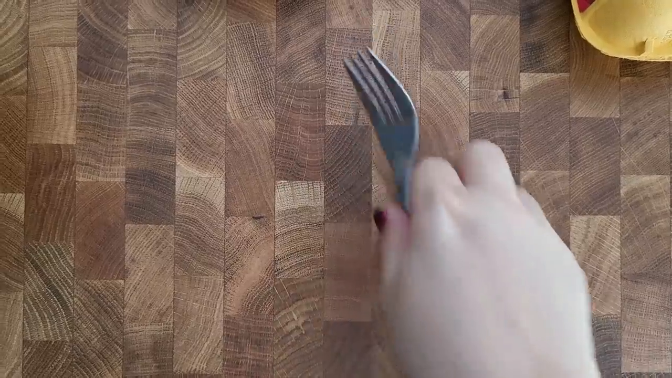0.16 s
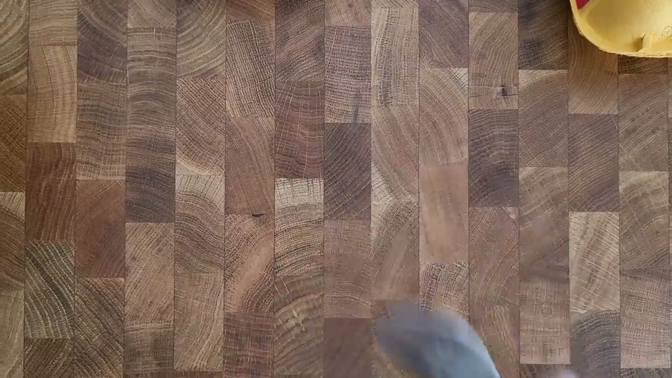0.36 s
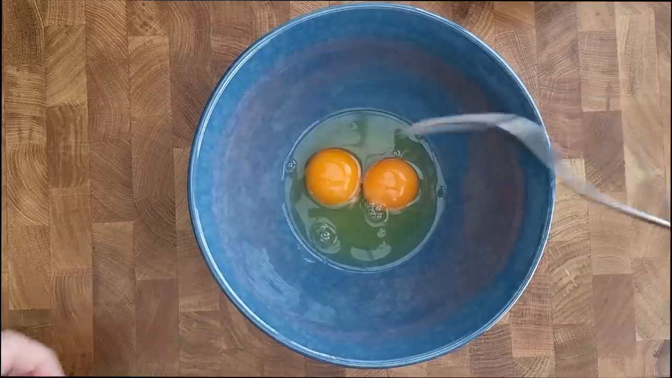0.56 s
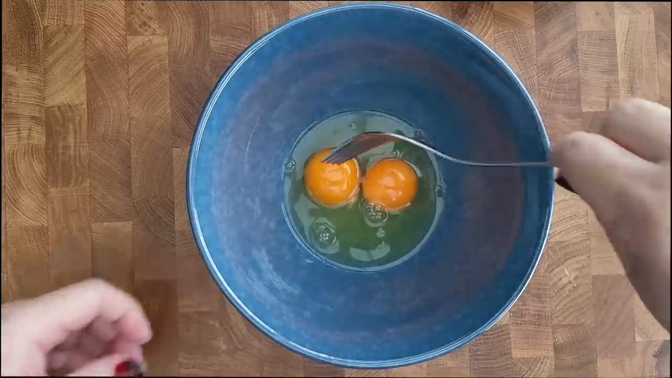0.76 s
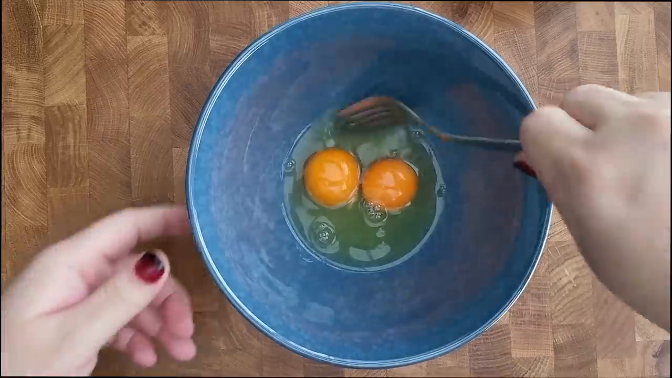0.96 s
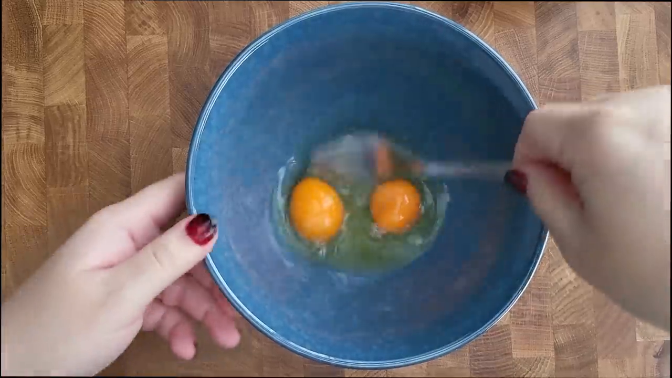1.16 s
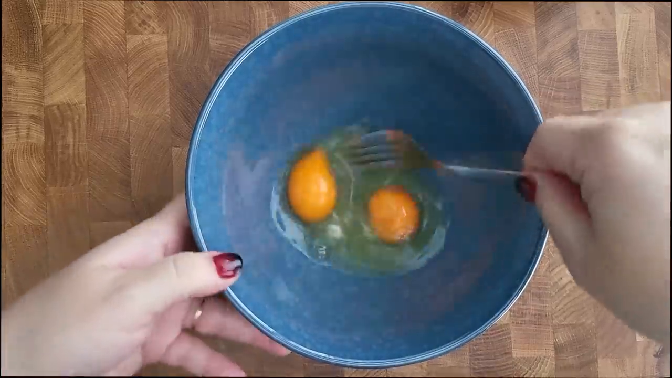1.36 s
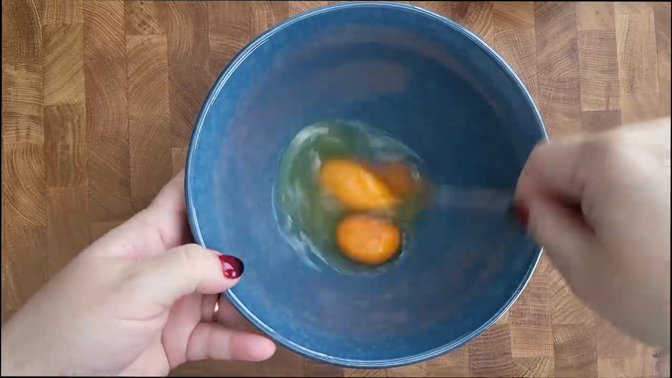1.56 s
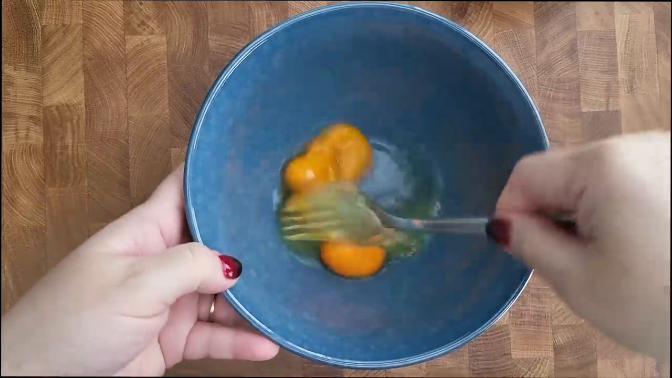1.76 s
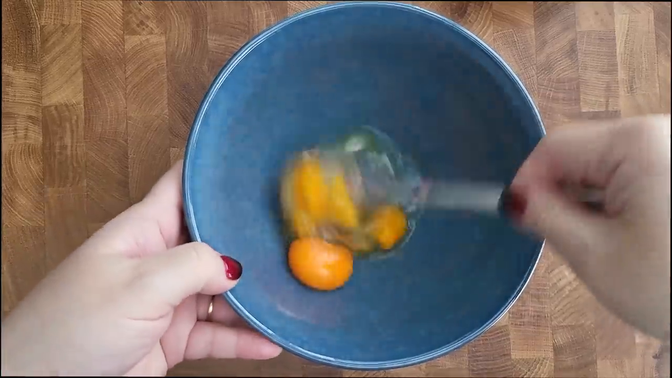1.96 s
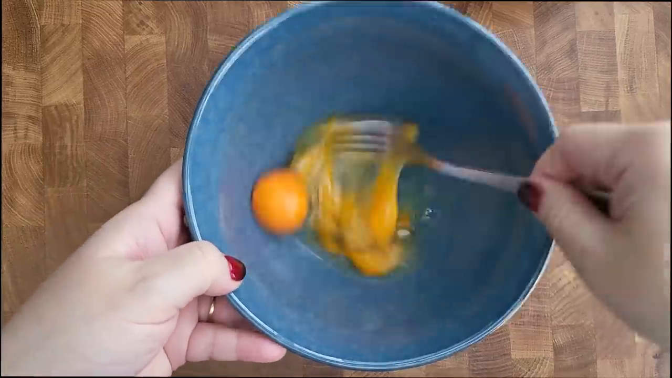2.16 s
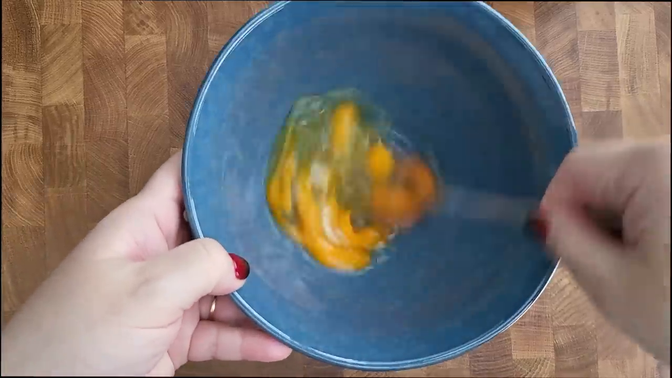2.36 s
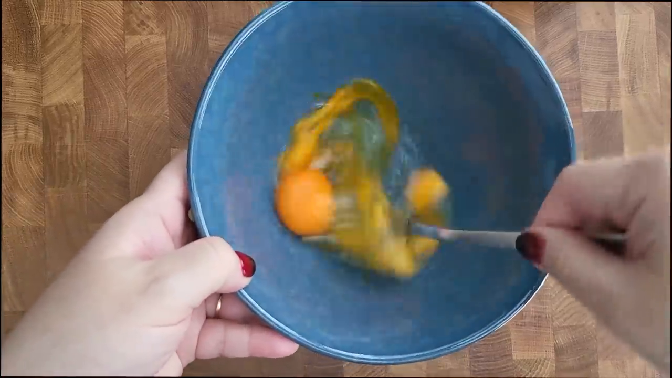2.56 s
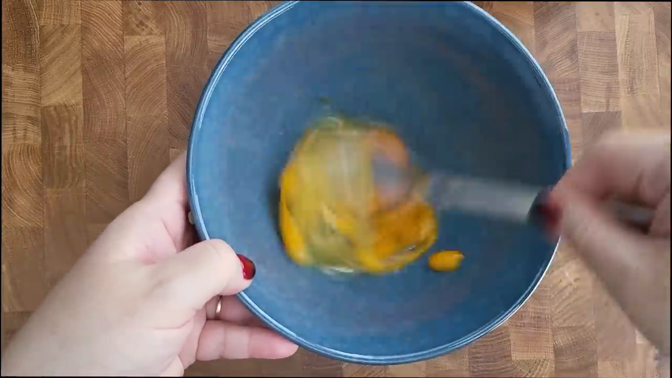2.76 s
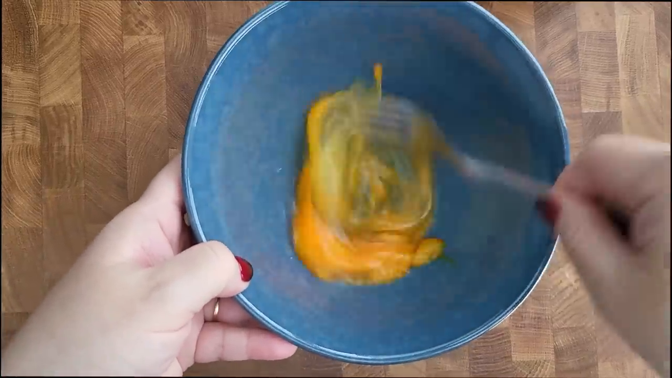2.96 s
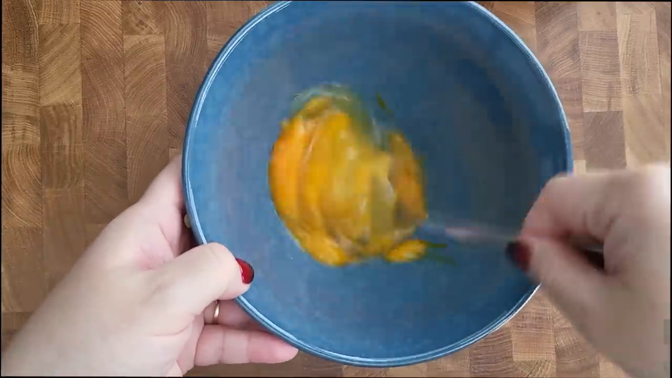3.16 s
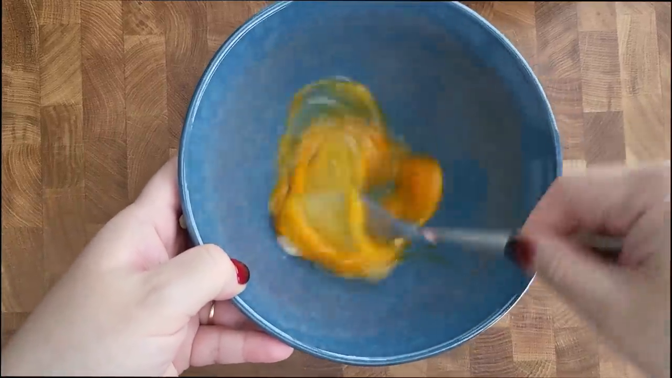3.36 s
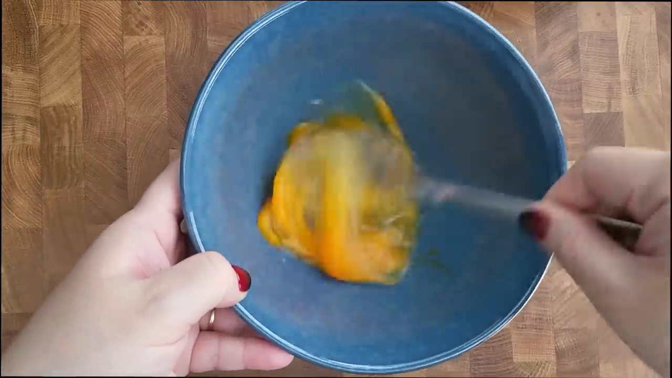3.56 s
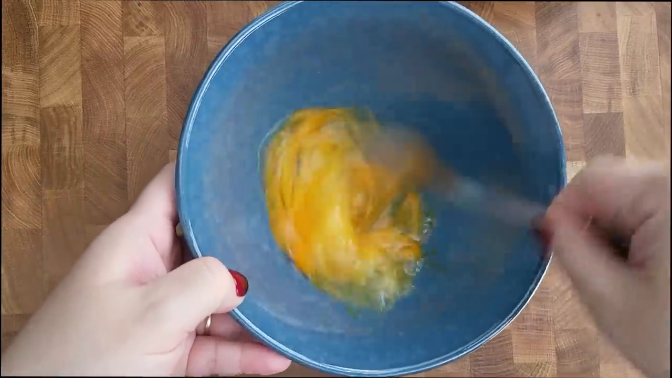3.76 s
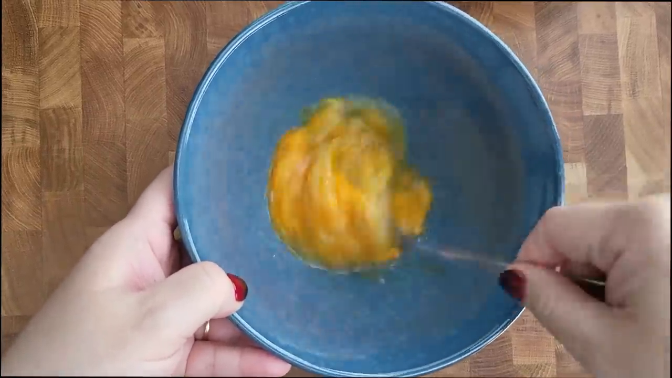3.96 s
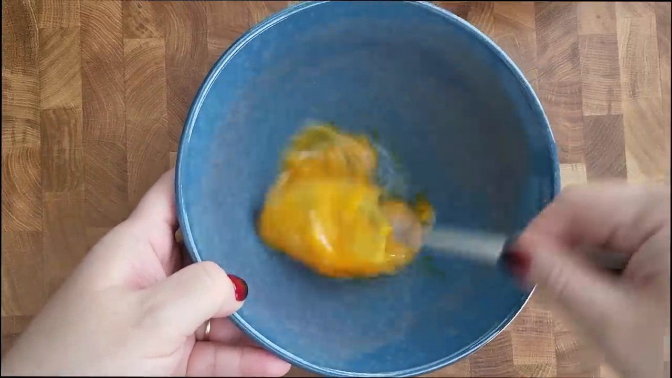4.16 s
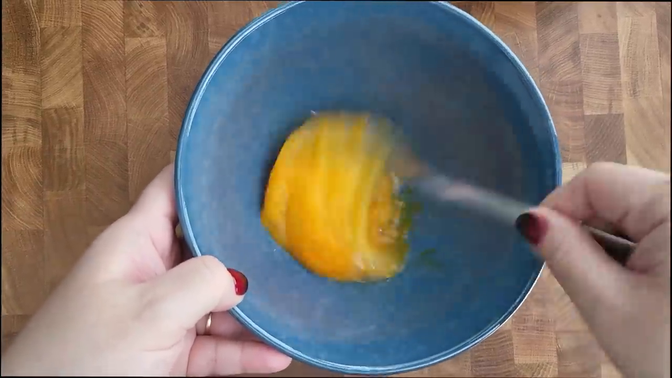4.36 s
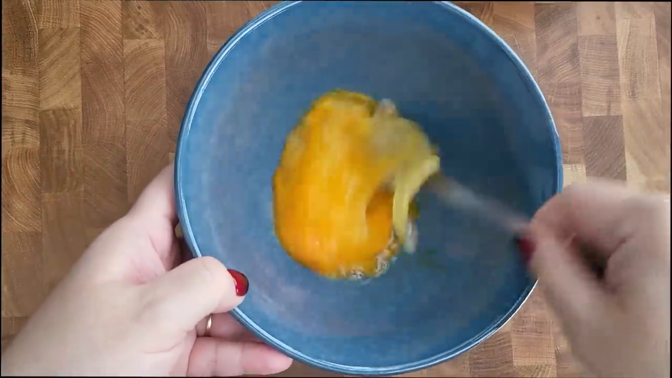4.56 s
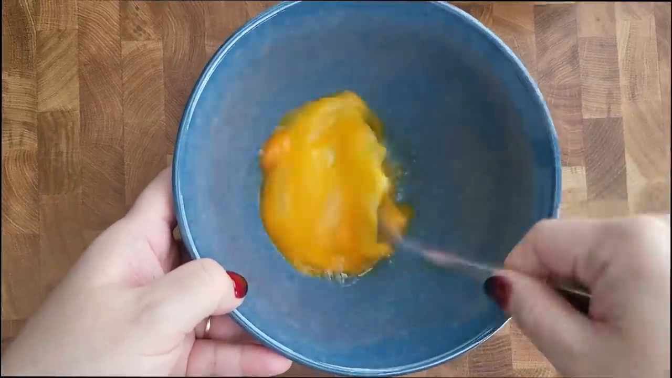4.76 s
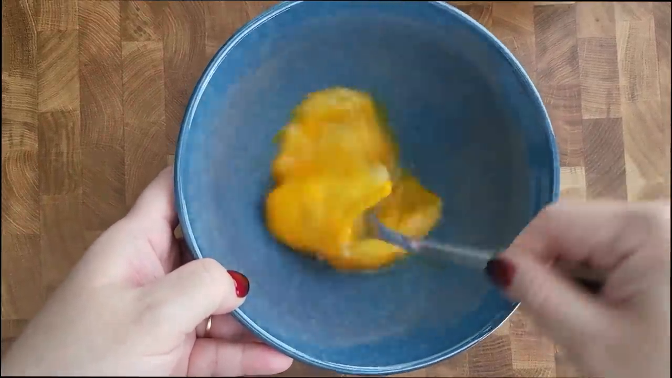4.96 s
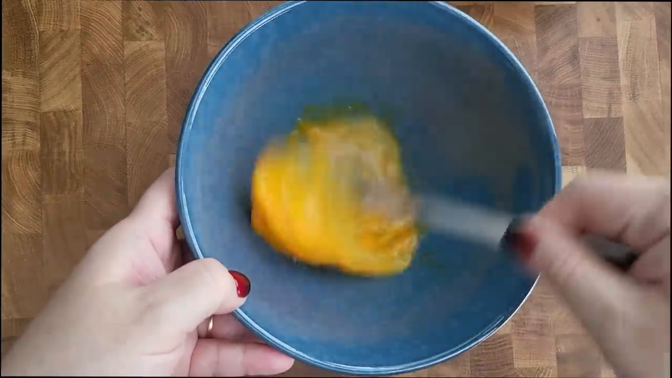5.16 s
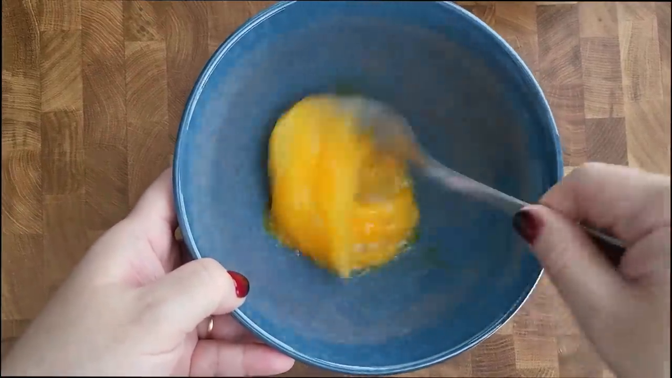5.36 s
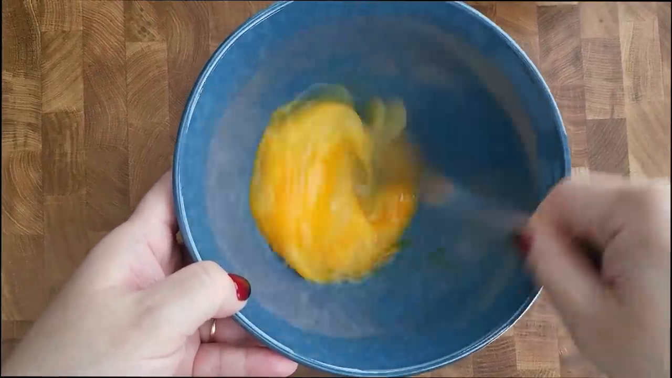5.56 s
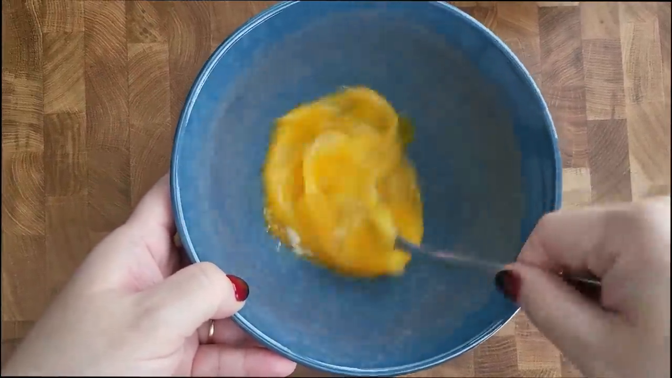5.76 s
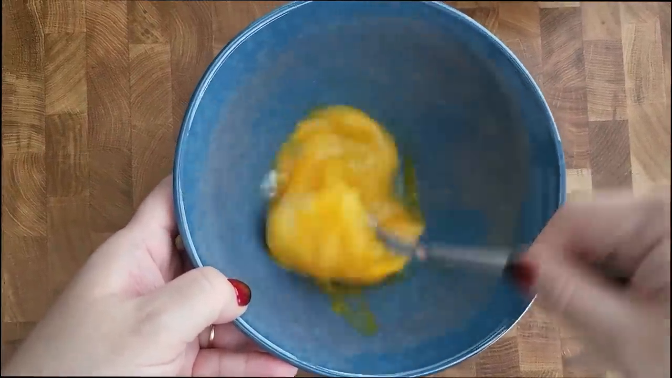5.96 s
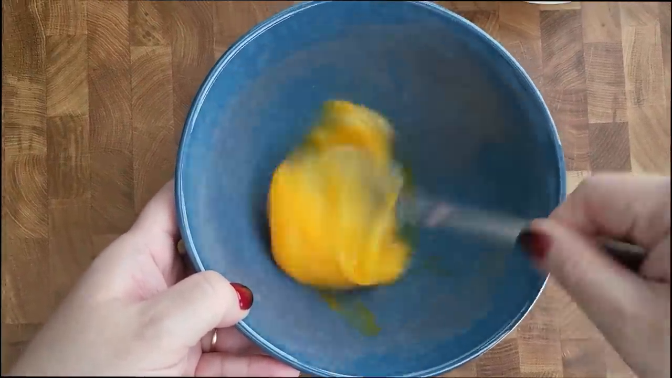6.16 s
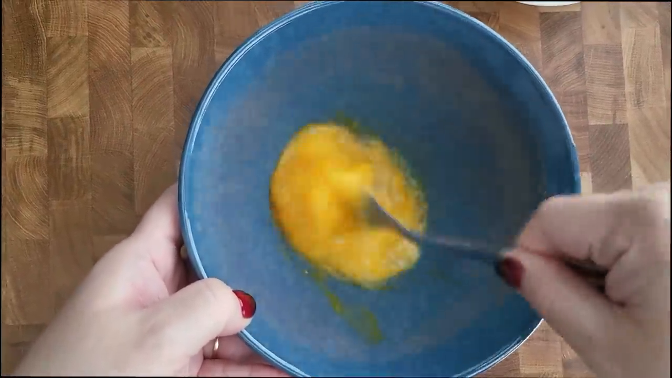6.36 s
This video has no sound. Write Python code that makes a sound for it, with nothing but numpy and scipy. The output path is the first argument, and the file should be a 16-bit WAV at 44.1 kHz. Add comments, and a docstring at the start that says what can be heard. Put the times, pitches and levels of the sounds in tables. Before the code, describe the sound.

After a short scrape on wood and a quiet pause, a steel fork whisks raw eggs, clinking steadily about six times a second against ceramic.

```python
"""A steel fork beats eggs in a ceramic bowl, six strokes a second: noise bursts through glaze resonances
clink over ringing tine sines; plops and short knocks, of air in the egg and of the struck bowl, are
damped sines, steady or gliding, over grainy, noisy slosh. Early blows boom in the wooden board as
decaying sines, until a hand lifts the bowl. First the fork is dragged off the board, as resonant noise;
the quiet kitchen adds decaying noise tails, room tone, a far rumble and a faint swish, all shaped noise."""
import sys
import numpy as np
from scipy import signal
from scipy.fft import rfft, irfft, next_fast_len
from scipy.io import wavfile
from scipy.ndimage import map_coordinates

SR = 44100
rng = np.random.default_rng(int(sys.argv[2]) if len(sys.argv) > 2 else 0)


def unload_wav(signal):
    """Save mono or channel-first audio to the path in sys.argv[1] as 16-bit WAV at rate SR, clipped to [-1, 1]."""
    wavfile.write(
        sys.argv[1],
        SR,
        np.round(np.clip(np.atleast_2d(signal).T, -1, 1) * 32767).astype(np.int16),
    )


N = 286650

# Contacts of the tines with the bowl: t/s, relative level/dB
TINE_CONTACTS = [(1.033, -23.5), (1.0437, -23.5), (1.2859, -13.5), (1.393, -41), (1.4293, -12.5),
                 (1.566, -22), (1.6076, -13), (1.66, -15), (1.7536, -14.5), (1.7668, -11.5), (1.8016, -12),
                 (1.9205, -16), (1.9332, -10.5), (1.9645, -19), (2.071, -18.5), (2.08, -8), (2.09, -7),
                 (2.2429, -6), (2.26, -21), (2.3996, -14.5), (2.4112, -11), (2.5476, -15.5), (2.5531, -9.5),
                 (2.567, -11.5), (2.71, -21), (2.73, -7.5), (2.7416, -18.5), (2.765, -25.5), (2.861, -21.5),
                 (2.871, -17), (2.883, -22), (2.9012, -8), (2.919, -23), (3.0362, -9.5), (3.048, -8.5),
                 (3.075, -45), (3.1884, -8.5), (3.2032, -9.5), (3.321, -27), (3.3408, -24), (3.3581, -7),
                 (3.393, -24.5), (3.5134, -11.5), (3.517, -4.5), (3.559, -26.0), (3.6605, -12.5),
                 (3.671, -8.5), (3.6978, -26), (3.712, -25), (3.817, -24.5), (3.826, -4.5), (3.976, -11),
                 (3.982, -7), (4.031, -24), (4.1231, -11.5), (4.1348, -9), (4.1836, -22), (4.2917, -8.5),
                 (4.302, -7.5), (4.351, -18.5), (4.454, -6.5), (4.463, -9.5), (4.512, -24), (4.6175, -9.5),
                 (4.627, -11.5), (4.792, -5.5), (4.817, -22), (4.925, -23.5), (4.96, -14), (4.972, -10.5),
                 (5.1265, -6.5), (5.3014, -7), (5.458, -15.5), (5.4681, -7.5), (5.6218, -7), (5.656, -27),
                 (5.751, -36), (5.776, -14.5), (5.7864, -7), (5.861, -32), (5.951, -4.5), (5.969, -16),
                 (6.1111, -6.5), (6.157, -23), (6.223, -38), (6.2568, -19), (6.272, -12.5), (6.278, -6),
                 (6.283, -11.5), (6.337, -30), (6.428, -13.5), (6.479, -26.5)]
# Resonances of bowl and tines: f/Hz, width/Hz, relative level/dB
GLAZE_MODES = [(2780, 990, 5.5), (3924, 920, 6), (5810, 930, 3.5), (7620, 900, 6), (9740, 950, 5.5),
               (12930, 1190, 7), (15100, 730, 2)]
# Ringing of the tines: f/Hz, relative level/dB, t60/s
TINE_MODES = [(3375, -14.5, 0.11), (4430, -4, 0.015), (7270, -0.5, 0.028), (9510, -0.5, 0.017),
              (11700, -3.5, 0.022)]
# scatter of the glaze resonances from contact to contact: log pitch, level in dB
SPOT_SHIFT, SPOT_DB = .05, 3


def clinks():
    """Each contact is a short rattle of steel on glaze plus the ring of the tines, damped by the egg."""
    out = np.zeros((2, N))
    t, hz_bins = np.arange(4096) / SR, np.fft.rfftfreq(4096, 1 / SR)
    noise = pair(0.27) * amp(4.43 * wobble(900))
    top_share = 1 / (1 + (9000 / (hz_bins + 1)) ** 8)  # opens above 9 kHz
    for (s, db), bright_db in zip(TINE_CONTACTS, brightness()):
        attack = 1 - np.exp(-t / 0.0011)
        decay = amp(-60 * t / 0.0089) + amp(-16.5 - 60 * t / 0.036)  # quick knock, slower rattle
        burst = amp(db + 2.5) * attack * decay * np.roll(noise, -round(s * SR), axis=1)[:, :t.size]
        # every spot of the bowl answers with its own pitches and strengths, at equal overall gain
        scatter = rng.standard_normal((len(GLAZE_MODES), 2))
        spot = [(hz * np.exp(SPOT_SHIFT * a), width, level_db + SPOT_DB * b)
                for (hz, width, level_db), (a, b) in zip(GLAZE_MODES, scatter)]
        response = resonances(spot)(hz_bins)
        usual_gain = np.linalg.norm(resonances(GLAZE_MODES)(hz_bins))
        evened = response * usual_gain / np.linalg.norm(response)
        colour = evened * (1 - top_share + top_share * amp(bright_db))
        add(out, s, irfft(rfft(burst) * colour))
        # the fork turns, so each mode reaches the two ports at a new strength and phase
        for hz, level_db, t60 in TINE_MODES:
            spread_db, phase = rng.normal(0, 3.8, (2, 1)), rng.uniform(0, 2 * np.pi, (2, 1))
            tilt_db = bright_db * (hz > 9000)
            fade = amp(db + level_db + tilt_db + spread_db - 14.5 - 60 * t / t60)
            add(out, s, fade * np.sin(2 * np.pi * hz * t + phase))
    return out


# a contact with another this close behind is a landing; under this table level, a light touch
BOUNCE_S, LIGHT_DB = .016, -18
# top treble: cushioned by egg, or steel on bare glaze
LANDING_DULL_DB, LIGHT_DULL_DB, BARE_BRIGHT_DB = -4.5, -5, 1


def brightness():
    """Top treble of each contact in dB: landings and light touches are cushioned by egg."""
    s, db = np.transpose(TINE_CONTACTS)
    landing = np.diff(s, append=np.inf) < BOUNCE_S
    return np.where(landing, LANDING_DULL_DB, np.where(db < LIGHT_DB, LIGHT_DULL_DB, BARE_BRIGHT_DB))


# Plops and short knocks: air pockets in the egg and damped tones of the struck bowl, steady or gliding:
# t/s, relative level/dB, starting f/Hz, glide/share of f (falls stop at -1/4), t60/s before the extra fade
PLOP_TONES = [(1.459, -39, 1360, 0.7, 0.17), (1.579, -36.5, 1247, 0.6, 0.092),
              (1.662, -20, 1730.0, 0.5, 0.036), (1.711, -29.5, 2150, 0.7, 0.022),
              (1.733, -29, 1450, 0.5, 0.027), (1.754, -20, 1334, 0.5, 0.025),
              (1.811, -23, 1680.0, 2, 0.023), (1.885, -30.5, 1700, 1, 0.011),
              (1.923, -13.5, 1252, 0.0, 0.047), (1.934, -11, 2665, 1.15, 0.013),
              (1.965, -15, 3200, -0.5, 0.016), (2.09, -26.5, 577, 0.0, 0.13), (2.1, -23, 2060, -2, 0.022),
              (2.129, -21.5, 1795, -0.4, 0.055), (2.221, -25, 885, 0.5, 0.045),
              (2.243, -8.5, 750, 0.2, 0.01), (2.288, -19.5, 815, 0, 0.071), (2.368, -24, 1370, 0, 0.033),
              (2.4, -10, 832, -0.5, 0.019), (2.445, -26, 2000, -0.5, 0.086), (2.55, -13, 788, 0.17, 0.034),
              (2.551, -10, 1313, -0.5, 0.041), (2.608, -15.5, 1720, -0.06, 0.036),
              (2.728, -17.5, 1540, 0.6, 0.043), (2.768, -12.5, 1540, 0.5, 0.054),
              (2.861, -16.5, 1410, 1, 0.017), (2.996, -35.5, 746, 0, 0.094),
              (2.897, -11.5, 1340, 1.5, 0.015), (3.038, -5.5, 1450, 0.5, 0.0066),
              (3.039, -7, 718, 0.7, 0.061), (3.179, -9.5, 753, 0.04, 0.049), (3.197, -9.5, 1504, 3, 0.086),
              (3.23, -8, 1010, 0.54, 0.042), (3.32, -18, 857, 0.36, 0.039), (3.36, -1.5, 2720, 0.7, 0.02),
              (3.393, -18, 3250, -0.0, 0.02), (3.513, -10, 966, 2.5, 0.017),
              (3.517, -16.5, 565, -0.5, 0.026), (3.535, -15.5, 735, 0.5, 0.019),
              (3.556, -19, 1292, 0.5, 0.051), (3.662, -11, 746, -0.1, 0.014),
              (3.673, -7, 2640, 0.76, 0.024), (3.71, -21, 1740, -0.31, 0.022),
              (3.766, -31, 1270, 0.1, 0.019), (3.817, -12, 786, 0.5, 0.013), (3.826, -25, 550, 0.0, 0.095),
              (3.826, -9.5, 2360, 0.2, 0.038), (3.856, -20.5, 655, 0, 0.18), (3.858, -1, 887, 0.8, 0.036),
              (3.864, -18.5, 1600, 0.7, 0.041), (3.871, -18, 1106, 1.5, 0.1), (3.985, -8, 2220, 1, 0.0097),
              (4.004, -16, 880, 0.1, 0.03), (4.125, -4.5, 984, -0.5, 0.033), (4.135, -11, 1800, 0.5, 0.015),
              (4.175, -13, 1150, 0.3, 0.035), (4.177, -10, 1550, 0.3, 0.045),
              (4.293, -18, 956, -0.3, 0.061), (4.293, -6.5, 1670, -0.5, 0.015), (4.351, -22, 900, 0, 0.05),
              (4.351, -22, 900, 0, 0.05), (4.353, -21, 1450, -0.3, 0.096), (4.453, -11, 1480, 2, 0.01),
              (4.454, -10, 452, -0.3, 0.074), (4.455, -2.5, 890, -0.16, 0.013),
              (4.508, -12.5, 1120, 0, 0.015), (4.619, -10.5, 906, 0.5, 0.024), (4.619, -8, 1540, 1, 0.0075),
              (4.619, -20.5, 457, 0.0, 0.085), (4.652, -14.5, 1450, 0.3, 0.02),
              (4.667, -20, 810, 0.1, 0.038), (4.793, -9.5, 1774, 0.06, 0.017),
              (4.798, -26.5, 462, 0.0, 0.12), (4.827, -16, 1550, 0.0, 0.037), (4.96, -5, 900, -0.2, 0.017),
              (4.961, -8.5, 426, -0.12, 0.11), (5.0, -22.5, 735, -0.5, 0.058),
              (5.124, -12.5, 1586, 1.4, 0.029), (5.125, -13, 432, 0.0, 0.087), (5.127, 3, 840, 0.94, 0.018),
              (5.15, -18.5, 961, -0.54, 0.12), (5.165, -24.5, 1600, -0.5, 0.053),
              (5.3, -17, 2850, -5, 0.023), (5.303, -6, 1940, -1, 0.015), (5.316, -18, 860, -0.091, 0.049),
              (5.317, -13.5, 1906, 1.07, 0.045), (5.324, -12, 1210, 0.1, 0.029),
              (5.422, -31, 723, -0.13, 0.091), (5.463, -7, 3050, -0.3, 0.015),
              (5.468, -17, 844, 0.1, 0.062), (5.47, -9, 1900, 0.0, 0.037), (5.484, -6, 904, -0.1, 0.023),
              (5.506, -19, 1000, 1, 0.025), (5.622, -11, 2384, -0.3, 0.028), (5.661, -19, 1750, 0.5, 0.033),
              (5.685, -25, 970, 0.1, 0.03), (5.778, -1, 1380, 0.24, 0.039), (5.951, -5.5, 2060, 2, 0.025),
              (5.968, -6, 3230, 0.9, 0.018), (6.095, -17.5, 800, -0.15, 0.039),
              (6.11, -11.5, 2740, -0.1, 0.012), (6.142, -26, 840, 0.2, 0.03), (6.271, -4, 778, 0.4, 0.026),
              (6.279, -15, 1360, 0, 0.016), (6.428, -9, 750, 2.3, 0.02)]
GLIDE_S = 0.0261  # time constant as the glide levels off
BREAK_S, BREAK_DB = 0.04, 13  # wide gliders die early: dB lost by BREAK_S per unit of glide
LOW_CUT = .75  # each tone is high-passed at this share of its lowest pitch
# shake of a tone in log pitch and in level; calmer below the steady pitch
WAVER, TREMBLE_DB, STEADY_HZ = .035, 5, 800


def plops():
    """Each plop or knock is one damped, trembling sine, steady or gliding to a new pitch."""
    out, steps = np.zeros(N), np.arange(SR // 5)
    t = steps / SR
    shaking = np.array([wobble(150), wobble(200)])
    for s, db, hz, glide, t60 in PLOP_TONES:
        # pitch and strength shake less in the deep tones
        waver, tremble = shaking[:, (round(s * SR) + steps) % N] * min(hz / STEADY_HZ, 1) ** 2
        bend = 1 + max(glide, -1 / 4) * (1 - np.exp(-t / GLIDE_S))
        break_db = BREAK_DB * abs(glide) * (t / BREAK_S) ** 2
        attack = (1 - np.exp(-t * hz / 0.26)) ** 2
        fade = amp(db - 60 * t / t60 - break_db + TREMBLE_DB * tremble) * attack
        cycles = hz * np.cumsum(bend * np.exp(WAVER * waver)) / SR
        tone = fade * np.sin(2 * np.pi * cycles)
        highpass = signal.butter(3, LOW_CUT * hz * bend.min(), "high", fs=SR)
        add(out, s, signal.lfilter(*highpass, tone))
    return out


# Effort of the beating: t/s, gurgle level/dB, wet hiss level/dB (both before strokes and grains)
BEATING_EFFORT = [(1.0, -88, -66), (1.5, -67.5, -57), (2.2, -46.5, -48), (5.9, -42, -46.5), (6.5, -46, -49)]
# Colour of the gurgle: f/Hz, relative level/dB per Hz
GURGLE_COLOUR = [(300, -17), (500, -15), (800, 0.5), (1100, -12), (1900, 2.5), (2400, -19), (4500, -13),
                 (7000, -74)]
# Colour of the wet hiss: f/Hz, relative level/dB per Hz
HISS_COLOUR = [(1500, -15), (3000, -7), (5000, -15.5), (7000, -7.5), (13000, -14.5), (16000, -35)]


def slosh():
    """Folding egg: bubbles on a lumpy gurgle, and a wet hiss in which films snap while the fork moves."""
    gurgle, hiss = curves(BEATING_EFFORT)
    lumps = amp(6.2 * wobble(70))
    body = unit(filtered(pair(0.65) * lumps, lambda hz: amp(along(GURGLE_COLOUR, hz))))
    shimmer = amp(3 * wobble(120))
    film = unit(filtered(pair(0.27) * shimmer, lambda hz: amp(along(HISS_COLOUR, hz))))
    bubbles = grains(count=1300, hz=1251, spread=0.3304, cycles=6.4, size_db=4.0)
    blips = grains(count=400, hz=1198.0, spread=0.35, cycles=10.5, size_db=1, rise=0.0592)
    # separate grains left and right
    snaps = np.array([grains(count=1600, hz=3388, spread=0.394, cycles=7.2, size_db=5) for _ in "LR"])
    ticks = np.array([grains(count=500, hz=6600, spread=0.46, cycles=2.7, size_db=4.5) for _ in "LR"])
    splash = strokes(swell=0.18, t60=0.064)
    folding = strokes(swell=0.084, t60=0.16)
    gurgling = gurgle * folding * (body + 0.75 * bubbles + 0.9 * blips)
    snapping = 0.94 * np.minimum(splash, 1) * (snaps + 0.2 * ticks)
    return gurgling + hiss * splash * (film + snapping)


def strokes(swell, t60):
    """Effort curve of mean 1: the fork enters just before each contact, ploughs on, then the egg settles."""
    out, t = np.full(N, .03), np.arange(SR // 4) / SR
    for s, db in TINE_CONTACTS:
        plough = swell * np.exp(-((t - rng.normal(.048, .005)) / .022) ** 4)
        entry = (1 - np.exp(-t / .006)) ** 2
        add(out, s - .009, amp(db) * (amp(-60 * t / t60) * entry + plough))
    return out / out.mean()


def grains(count, hz, spread, cycles, size_db, rise=0.04):
    """Short damped tones of rising pitch, scattered in time; spread is in log pitch."""
    s, pitch = rng.uniform(0, N, count), rng.normal(0, 1, count)
    size = np.minimum(rng.exponential(1, count), 3)
    t = np.arange(1500) / SR
    tone_hz = np.minimum(hz * np.exp(spread * pitch), SR / 3)[:, None]
    life = t * tone_hz / cycles
    fade = amp(size_db * size)[:, None] * life * np.exp(-2 * life)
    tone = fade * np.sin(2 * np.pi * tone_hz * t * (1 + rise * life))
    places = s.astype(int)[:, None] + np.arange(t.size)
    return unit(np.bincount(places.ravel(), tone.ravel(), N + t.size)[:N])


# Blows that reach the board: t/s, relative level/dB, boom/dB (extra in the lowest modes)
BOARD_BLOWS = [(1.034, -38.5, 3), (1.289, -30.5, -9), (1.431, -31, -11), (1.607, -30.5, -15),
               (1.669, -34.5, -11), (1.767, -31, -6), (1.801, -29, -10.5), (1.931, -31.5, -4.5),
               (2.084, -29, 2.5), (2.24, -48, -37)]
# Modes of the wood: f/Hz, relative level/dB, t60/s
BOARD_MODES = [(91.3, -1, 0.33), (187.3, -7, 0.216), (283, -10, 0.29), (347.1, -7.5, 0.25),
               (379.5, -6, 0.33), (407, 2.5, 0.08), (427.3, -2, 0.11), (812, 2.5, 0.035)]


def board():
    """Blows pass through the foot of the bowl into the wood, which swells up softly; flat blows boom."""
    out, t = np.zeros(N), np.arange(SR // 3) / SR
    for s, db, boom_db in BOARD_BLOWS:
        for hz, level_db, t60 in BOARD_MODES:
            boom_share = np.clip(1.4 - hz / 220, 0, 1)
            size = amp(db + level_db + boom_db * boom_share + rng.normal(0, 2.2))
            swell = (1 - np.exp(-t * hz / 0.93)) ** 2
            tone = np.sin(2 * np.pi * hz * rng.normal(1, 0.022) * t)
            add(out, s, size * amp(-60 * t / t60) * swell * tone)
    return out * amp(3.5 * wobble(60))


# Fork along the wood: t/s, level/dB
DRAG_LEVEL = [(0, -59), (.02, -51), (.06, -53), (.13, -54), (.147, -47.5), (.18, -59), (.4, -82)]
# Resonances of the scraping: f/Hz, width/Hz, relative level/dB
SCRAPE_MODES = [(412, 46, 13.5), (1300, 250, 6), (2600, 110, 0), (3400, 300, -14), (4820, 210, -14),
                (7900, 130, -27)]


def drag():
    """The fork slips unevenly over the wood before it lifts: wavering noise through resonances."""
    slips = pair(0.16) * amp(2 * wobble(120))
    return curves(DRAG_LEVEL)[0] * unit(filtered(slips, resonances(SCRAPE_MODES)))


# Differences of near sources at the two ports: f/Hz, left-right level/dB, left lead/rad
PORT_DIFFERENCES = [(100, 0, 0), (420, -2, .2), (900, 5, .4), (1400, 13, .5), (2000, 12, -1),
                    (2400, -2, -1.5), (2850, -10, 1), (3500, 5, .3), (4700, -3, -.3), (6400, 5, -1.3),
                    (9700, -4, -2.1), (12000, 2, -2.1), (16000, 2, 0)]


def ports(x):
    """Each band reaches the two ports with its own level difference and phase lead, total power kept."""
    side = np.array([[.5], [-.5]])

    def response(hz):
        level_db, lead = along(PORT_DIFFERENCES, hz), along(PORT_DIFFERENCES, hz, axis=2)
        even_power = np.sqrt(np.cosh(level_db * np.log(10) / 20))
        return amp(side * level_db) * np.exp(1j * side * lead) / even_power

    return filtered(x, response)


# Reverberation of the room: f/Hz, t60/s
KITCHEN_DECAY = [(150, 0.93), (1000, 0.37), (5000, 0.2), (15000, 0.24)]


def kitchen(x):
    """Each frequency of the tail dies at its own speed; the moving bowl gets a new tail each 1/6 s."""
    out, step = np.zeros((2, N)), SR // 6
    for start in range(0, N, step):
        hz, t, z = signal.stft(rng.standard_normal((2, SR // 2)), SR, nperseg=256)
        decay = amp(-60 * t / along(KITCHEN_DECAY, hz)[:, None])
        tail = signal.istft(z * decay, SR, nperseg=256)[1]
        tail = tail / np.linalg.norm(tail[0])
        wet = signal.fftconvolve(x[None, start:start + step], tail, axes=1)
        add(out, start / SR + .006, wet)  # 6 ms before the room answers
    return out


# Colour of the room tone: f/Hz, relative level/dB per Hz
AIR_COLOUR = [(12, -60), (20, -15), (56, -0.5), (86, -28), (210, -15.5), (248, -14.5), (422, -18.5),
              (1760, -29.5), (2260, -39), (4810, -43), (16000, -62)]
# Stereo width of the room tone: f/Hz, left-right likeness (1 alike, -1 opposed)
AIR_LIKENESS = [(30, 0.87), (70, 1), (300, 0.75), (950, -0.45), (15000, -0.32)]
# Far rumble that comes and goes: t/s, level/dB
RUMBLE_LEVEL = [(0, -65.5), (2.4, -65), (3.5, -60.5), (5.2, -73), (5.5, -56), (6.5, -63)]
# Faint narrow swish near 1.9 kHz: t/s, level/dB
SWISH_LEVEL = [(.58, -92), (.63, -80), (1.05, -77)]
AIR_DB = -61  # room tone before its slow drift


def air():
    """Noise as room tone, alike in the bass and opposed in the treble, with the rumble and the swish."""

    def mid_side(hz):
        turn = np.arccos(np.clip(along(AIR_LIKENESS, hz), -1, 1)) / 2
        return amp(along(AIR_COLOUR, hz)) * [np.cos(turn), np.sin(turn)]

    mid, side = filtered(rng.standard_normal((2, N)), mid_side)
    low = filtered(pair(1.0), lambda hz: resonances([(68, 30, 0)])(hz) ** 2)
    rumble = curves(RUMBLE_LEVEL)[0] * unit(low)
    narrow = filtered(pair(0.21), lambda hz: resonances([(1850, 200, 0)])(hz) ** 2)
    swish = curves(SWISH_LEVEL)[0] * unit(narrow)
    drift = amp(wobble(3.4))
    return amp(AIR_DB) * drift * unit(np.array([mid + side, mid - side])) + rumble + swish


def amp(db):
    """Decibels to linear gain."""
    return 10 ** (np.asarray(db) / 20)


def unit(x):
    """x scaled to an RMS of 1."""
    return x / np.sqrt(np.mean(x ** 2) + 1e-20)


def along(points, hz, axis=1):
    """One column of (Hz, ..) points, interpolated on a log frequency axis."""
    p = np.array(points, float)
    return np.interp(np.log(hz + 1), np.log(p[:, 0] + 1), p[:, axis])


def curves(rows):
    """Gains per sample for each dB column, at -120 dB outside the rows."""
    s, *cols = np.transpose(rows)
    return [amp(np.interp(np.arange(N) / SR, s, c, left=-120, right=-120)) for c in cols]


def wobble(rate):
    """A smooth random curve, rate knots a second."""
    knots = rng.standard_normal(int(N * rate / SR) + 4)
    return map_coordinates(knots, [np.arange(N) * rate / SR])


def filtered(x, response):
    """x times a complex response of frequency."""
    m = next_fast_len(N + SR // 2)
    return irfft(rfft(x, m) * response(np.fft.rfftfreq(m, 1 / SR)), m)[..., :N]


def resonances(modes):
    """Causal response of (Hz, width, dB) modes, with alternating signs."""
    return lambda f: sum((-1) ** k * amp(db) * 1j * f * w / (c * c - f * f + 1j * f * w)
                         for k, (c, w, db) in enumerate(modes))


def add(track, s, sound):
    """Mixes a short sound in at time s."""
    start = round(s * SR)
    part = track[..., start:start + sound.shape[-1]]
    part += sound[..., :part.shape[-1]]


def pair(alike):
    """Stereo white noise of the given left-right likeness."""
    a, b = rng.standard_normal((2, N))
    turn = np.arccos(np.clip(alike, -1, 1)) / 2
    mid, side = np.cos(turn) * a, np.sin(turn) * b
    return np.array([mid + side, mid - side])


def scene():
    """Mixes the bowl, its echoes near and far, the board, the drag and the room tone."""
    near = clinks() + plops() + slosh()
    wood = board()
    direct = ports(near + amp(-31.0) * kitchen(near.mean(0)))
    room = amp(-13.0) * kitchen(near.mean(0) + wood)
    return direct + wood + room + drag() + air()


TOP_HZ = 16600  # upper band limit


def record(dry):
    """A soft ceiling rounds the loudest clinks; a steep low-pass then removes what lies above the band limit."""
    capped = dry / (1 + np.abs(dry / .95) ** 6) ** (1 / 6)
    return filtered(capped, lambda hz: 1 / (1 + (hz / TOP_HZ) ** 90))


dry = scene()
out = record(dry)
unload_wav(out)
```